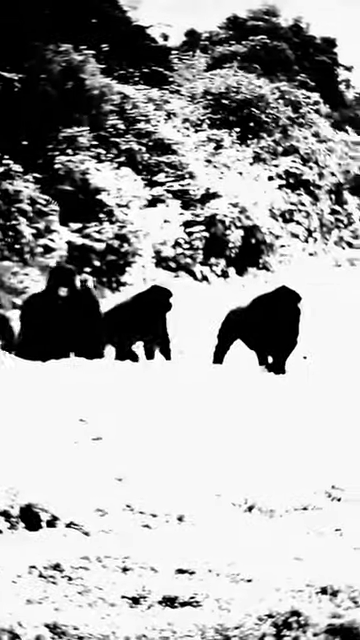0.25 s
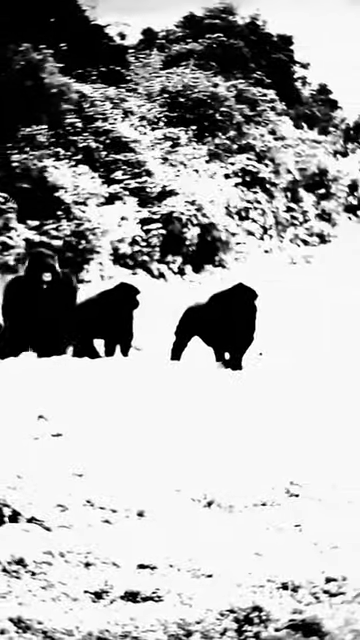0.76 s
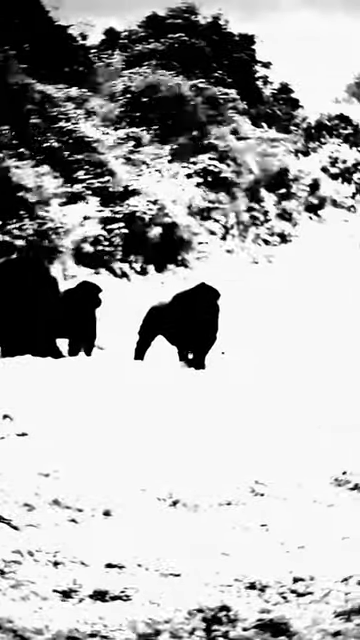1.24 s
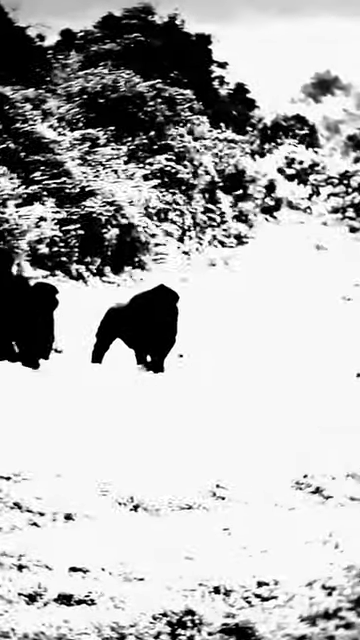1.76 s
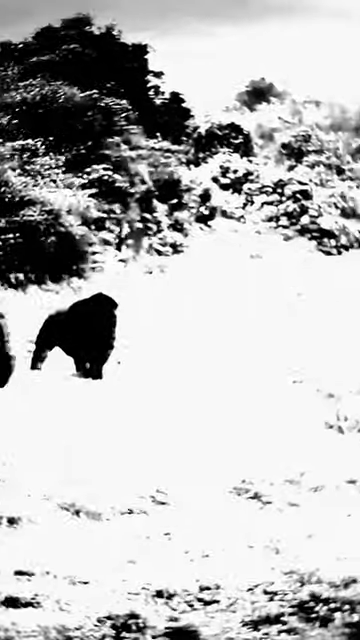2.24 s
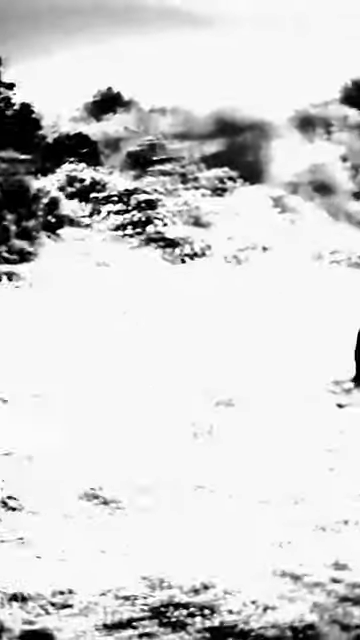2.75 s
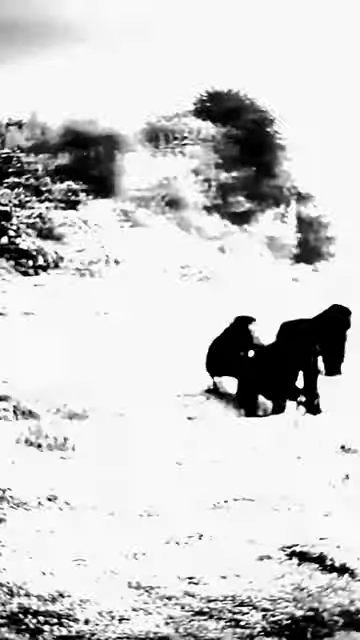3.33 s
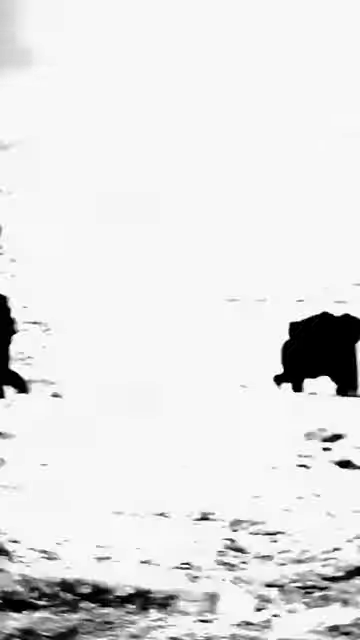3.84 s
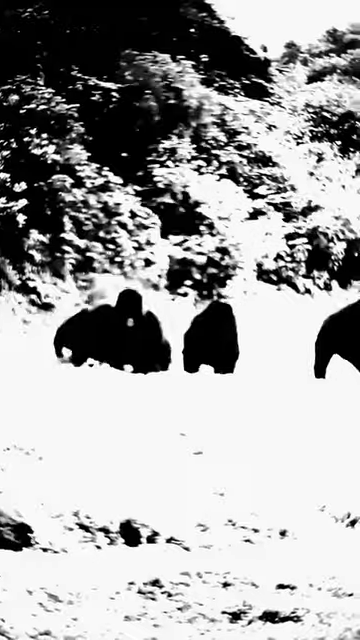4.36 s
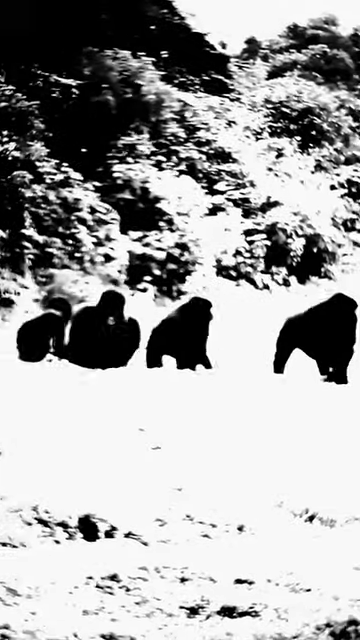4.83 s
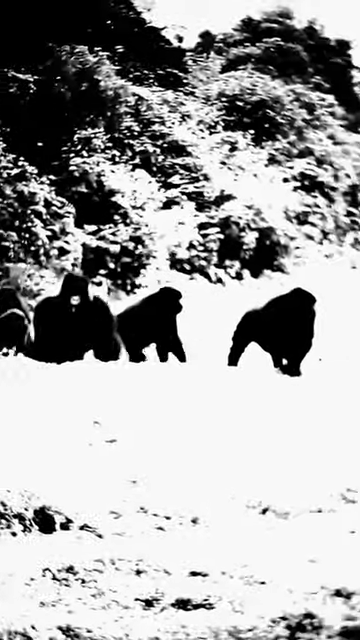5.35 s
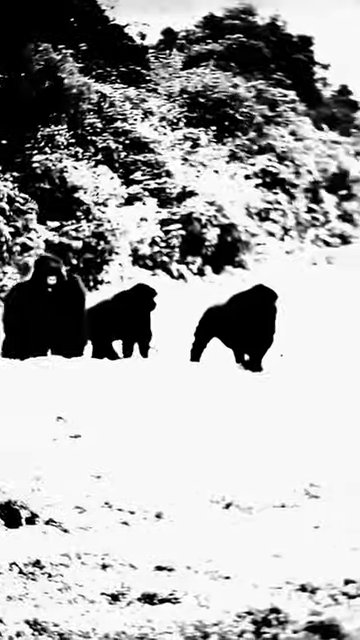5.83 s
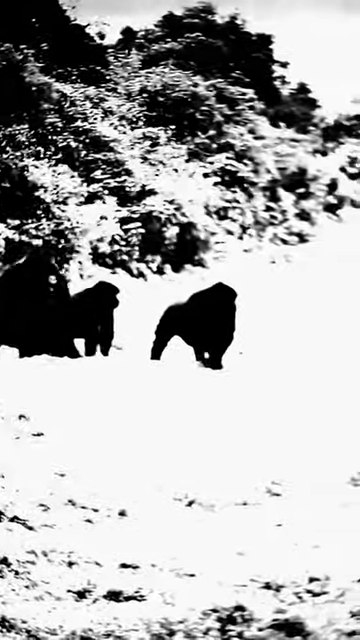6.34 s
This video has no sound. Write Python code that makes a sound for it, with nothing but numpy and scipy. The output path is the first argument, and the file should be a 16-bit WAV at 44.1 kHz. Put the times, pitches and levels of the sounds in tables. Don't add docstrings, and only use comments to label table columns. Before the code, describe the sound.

Close, dry outdoor pickup on a small two-port microphone, with soft low wind rumble, hum and thin air. Apes give breathy throat barks, rattling trills of glottal flaps and loud jaw snaps, then surging, raspy screeches from wide-open mouths. Others stir faintly in the bushes. The calls shrink to a growl, cut out briefly after four seconds, nearly stop, then the opening barks repeat abruptly.

```python
import sys
import numpy as np
from scipy import signal
from scipy.fft import rfft, irfft, next_fast_len
from scipy.io import wavfile
from scipy.ndimage import uniform_filter1d, minimum_filter1d

SR = 44100
rng = np.random.default_rng(int(sys.argv[2]) if len(sys.argv) > 2 else 0)


def magnitude_from_level(level_db):
    exponent = np.asarray(level_db, float) / 20
    return 10 ** exponent


def wrap_up_sound(samples):
    columns = np.atleast_2d(samples).T
    tamed = np.clip(columns, -1, 1)
    steps = np.round(tamed * 32767).astype(np.int16)
    wavfile.write(sys.argv[1], SR, steps)


N = 290619
STEP = 32


def evened(x):
    return x / np.sqrt(np.mean(x ** 2) + 1e-20)


def noise():
    return rng.standard_normal(N)


def read(hz, at_hz, value):
    return np.interp(np.log(hz + 1), np.log(np.asarray(at_hz) + 1), value)


def add(mix, s, sound):
    part = mix[round(s * SR):][:len(sound)]
    part += sound[:len(part)]


def wander(per_s):
    return evened(signal.lfilter(*signal.butter(2, per_s, fs=SR), noise()))


def resonate(x, hz, width, count=2):
    turn = np.exp(2j * np.pi * np.cumsum(hz * np.ones(len(x))) / SR)
    r = np.exp(-np.pi * width / SR)
    z = x / turn + 1e-18
    for _ in range(count):
        z = signal.lfilter([1 - r], [1, -r], z)
    return evened((turn * z).real)


def coloured(x, points):
    at_hz, db = np.transpose(points)
    return evened(irfft(rfft(x) * magnitude_from_level(read(np.fft.rfftfreq(N, 1 / SR), at_hz, db)), N))


# start_s [s], wind_db [dB], hum_db [dB]
RUMBLE = [(0.0, -43, -45), (0.24, -59, -54.5), (0.5, -48, -48.5), (0.68, -51, -55), (2.11, -60.5, -52),
          (2.679, -84, -56.5), (3.1, -67, -56.5), (4.86, -100, -63.5), (5.08, -69, -52.5),
          (6.31, -87, -57.5), (6.59, -57, -54)]
# at_hz [Hz], density_db [dB per Hz]
AIR = [(53, -32.5), (90, 7), (124, 14.5), (156, -9), (410, -3.5), (918, 7.5), (1900, -12.5), (3130, 6),
       (4250, -35.5), (5520, -61.5), (9350, -120)]


def background():
    s, wind_db, hum_db = np.transpose(RUMBLE)
    t = np.arange(N) / SR
    wind = magnitude_from_level(np.interp(t, s, wind_db)) * resonate(noise(), 38, 14, count=4)
    hum = np.sqrt(2) * magnitude_from_level(2.5 * wander(4)) * np.sin(2 * np.pi * 59.8 * t)
    hum = hum + magnitude_from_level(-9) * resonate(noise(), 73, 30)
    hum = hum + magnitude_from_level(-7) * resonate(noise(), 80, 200)
    air = magnitude_from_level(-61.5 + 0.96 * wander(12)) * coloured(noise(), AIR)
    return wind + magnitude_from_level(np.interp(t, s, hum_db)) * evened(hum) + air


def puffs(flaps_per_s, jitter, depth, fade):
    turns = np.cumsum(flaps_per_s * np.exp(jitter * wander(24.745))) / SR
    strengths = magnitude_from_level(2.2 * np.clip(rng.standard_normal(4000), -2, 1.2))
    strength = strengths[turns.astype(int) % 4000]
    gate = uniform_filter1d(strength * np.exp(-(turns % 1) / fade), size=40)
    return (np.clip(1 - depth, 0, 1) + depth * evened(gate)) * noise()


def claps(per_s, jitter):
    turns = np.cumsum(per_s * np.exp(jitter * wander(150) + 0.12 * wander(6))) / SR
    closing = np.diff(np.floor(turns), prepend=0) > 0
    return evened(closing * magnitude_from_level(3 * noise()))


def bursts(s, hold, db, rise_db_s, fall_db_s):
    after = np.arange(0, N, STEP) / SR - s[:, None]
    gone = np.maximum(after - hold[:, None], 0)
    linger = magnitude_from_level(2 * (-44.5 - 64.5 * gone))
    shape = magnitude_from_level(2 * rise_db_s * np.minimum(after, 0)) * (magnitude_from_level(-2 * fall_db_s * gone) + linger)
    return magnitude_from_level(2 * db)[:, None] * shape


def along(curve, silent=-150):
    s, db, *columns = np.transpose(curve)
    t = np.arange(0, N, STEP) / SR
    return [np.interp(t, s, db, silent, silent)] + [np.interp(t, s, c) for c in columns]


def joined(powers, *values):
    total = powers.sum(0) + 1e-30
    weight = powers ** 2
    rows = [10 * np.log10(total)] + [(weight * v).sum(0) / weight.sum(0) for v in values]
    at = np.arange(0, N, STEP)
    return [np.interp(np.arange(N), at, uniform_filter1d(r, size=5)) for r in rows]


# start_s [s], effort_db [dB], throat_db [dB against mouth], throat_hz [Hz], breath_db [dB]
SCREAMS = [
    [(2.18, -52.5, 6.5, 1187, 14), (2.212, -25.5, 3, 1250, 8), (2.24, -19, 1.5, 1280, 0),
     (2.305, -23, -7.5, 1260, -2), (2.432, -18, -10, 1200, -7.5), (2.485, -17, -14.5, 1173, 4),
     (2.515, -21, -11, 1180, 6), (2.55, -15.5, -11.5, 1207, -8), (2.668, -26, -16, 1252, 2.5),
     (2.732, -16.5, -13, 1242, -5.5), (2.83, -18.5, -13.5, 1266, -5), (2.874, -21, -7, 1334, 0),
     (2.924, -42, 1.5, 1424, 12.5), (2.96, -51, -6, 1424, -1)],
    [(3.07, -50, -1.5, 1188, 17), (3.156, -26, 2, 1172, 4), (3.212, -20.5, -9.5, 1134, -2.5),
     (3.25, -20.5, -4, 1130, -5.5), (3.364, -23.5, -5, 1288, 0.5), (3.478, -20.5, -4, 1300, -1),
     (3.498, -21, -5, 1260, 3.5), (3.592, -25, -6.5, 1330, 1.5), (3.63, -38.5, 4.5, 1490, 17)],
    [(3.63, -42, 9, 1530, 15), (3.658, -24.5, 1, 1412, 4.5), (3.716, -22.5, -6, 1404, 4.5),
     (3.758, -27, -8, 1330, 5), (3.776, -38, 0, 1260, 16), (3.87, -49, -5, 1344, 18)],
]
# start_s [s], level_db [dB]
STIR = [(0.0, -69), (0.17, -56), (0.46, -55.5), (0.78, -60.5), (1.0, -54.5), (1.37, -59.5), (1.66, -50.5),
        (1.84, -59), (2.15, -51.5), (3.05, -50.5), (3.86, -50.5), (4.15, -50.5), (4.45, -69.5), (4.67, -71),
        (4.89, -81.5), (5.05, -63), (5.11, -54)]


def long_calls():
    return *np.transpose([along(c) for c in SCREAMS], (1, 0, 2)), along(STIR)[0][None]


# at_hz [Hz], density_db [dB per Hz]
RASP = [(3300, -30), (3700, 0), (4400, -3), (4950, -22), (5400, -14), (6200, -18), (6900, -12), (8650, -15),
        (8900, -25), (9700, -28), (10600, -32), (12000, -43), (15500, -51)]
# start_s [s], peak_db [dB], ring_hz [Hz]
SNAPS = [(0.0136, -23, 3350), (0.0376, -17, 3210), (0.0616, -10, 3060), (0.182, -34, 2590),
         (0.2208, -21, 2570), (.028, -26, 2820), (0.4808, -19, 3030), (0.4815, -29, 4260),
         (0.4912, -24.5, 2000), (0.492, -28, 4060), (0.501, -3.5, 2990), (0.518, -10.5, 3114),
         (0.5336, -7.5, 2940), (0.9553, -26, 3300), (1.1159, -21, 2540), (1.17, -12, 2580),
         (1.242, -12, 2900), (1.3973, -25.5, 2970), (1.9319, -23, 2380), (1.951, -19, 2280),
         (1.9783, 8, 2867), (1.992, -4, 2746), (2.204, -22, 2430), (3.651, -24, 2830), (3.7501, -5, 3110),
         (4.2374, -16.5, 3200), (4.25, -19, 3020), (4.269, -5.5, 3110), (4.281, -13, 3020)]
# start_s [s], peak_db [dB], throat_hz [Hz]
FLAPS = [(0.183, -36.5, 728), (0.183, -26, 1140), (0.195, -29.5, 1082), (0.218, -17, 1108),
         (0.241, -18.5, 993), (0.339, -26.5, 1366), (0.379, -23, 1284), (0.387, -26, 1380),
         (0.439, -30.5, 1330), (0.5, -23, 1536), (0.523, -32.5, 940), (0.544, -14, 1094),
         (0.753, -39, 1400), (0.786, -44, 1470), (0.809, -33, 1525), (0.829, -25.5, 967),
         (0.829, -30.5, 984), (0.871, -22.5, 957), (0.992, -31, 1400), (1.025, -34, 1250),
         (1.069, -46, 1240), (1.098, -30, 1374), (1.12, -21, 1260), (1.127, -22.5, 1004),
         (1.171, -10.5, 1208), (1.284, -25, 966), (1.347, -38, 1048), (1.397, -35, 925),
         (1.418, -23.5, 1070), (1.446, -17.5, 1280), (1.526, -13, 1126)]
# start_s [s], peak_db [dB], throat_hz [Hz]
MORE_FLAPS = [(0.202, -22, 1084), (0.228, -21.5, 998), (0.257, -21.5, 952), (0.269, -24.5, 1036),
              (0.296, -32.5, 1344), (0.306, -28, 1410), (0.315, -28.5, 1410), (0.35, -24.5, 1326),
              (0.363, -27.5, 1360), (0.395, -29.5, 1366), (0.407, -28.5, 1270), (0.419, -32, 1293),
              (0.455, -28, 1296), (0.467, -33, 1320), (0.554, -21, 923), (0.571, -12, 982),
              (0.583, -22, 1000), (0.595, -18, 954)]
# start_s [s], peak_db [dB], throat_hz [Hz]
GROWL_FLAPS = [(3.864, -40.5, 1530), (3.901, -35, 1165), (3.915, -29, 1480), (3.928, -20, 1520),
               (3.948, -23, 768), (3.968, -30.5, 1440), (3.992, -19, 1540), (4.091, -33, 1265),
               (4.141, -40.5, 1250), (4.189, -29, 1047)]
# start_s [s], peak_db [dB], pitch_hz [Hz, at the start], t60_s [s]
KNOCKS = [(1.734, -53, 414, 0.056), (2.108, -26.5, 722, .03), (2.122, -17.5, 520, 0.028),
          (2.131, -20, 652, 0.03), (2.145, -27, 568, 0.024), (2.172, -36, 596, 0.074),
          (4.692, -45, 1020, 0.023), (4.97, -33.5, 1060, 0.065), (4.981, -39, 1190, .025),
          (4.998, -29, 520, 0.069), (5.0535, -21.5, 793, 0.061), (5.064, -26.5, 480, .05),
          (5.075, -35, 700, 0.02), (5.084, -37, 430, .04), (4.934, -43, 400, .04)]
# start_s [s], peak_db [dB], ring_hz [Hz]
FAR_SNAPS = [
    (4.941, -33, 2440),
    (4.951, -34, 2530),
    (4.962, -37, 2960),
    (4.969, -25, 2650),
    (4.99, -18, 2650),
    (4.998, -25, 2457),
    (5.008, -27, 2800),
]


def snaps():
    out, t = np.zeros(N), np.arange(6000) / SR
    spit = coloured(noise(), RASP)
    onset = np.sin(np.pi / 2 * np.minimum(t / 0.0028, 1)) ** 2
    flaps = FLAPS + GROWL_FLAPS + MORE_FLAPS
    for rows, spit_db, t60 in [(SNAPS, -17.5, 0.024), (FAR_SNAPS, -40, 0.024), (flaps, -45, 0.039)]:
        for s, db, hz in rows:
            ring = np.sin(2 * np.pi * hz * t) + magnitude_from_level(spit_db) * spit[round(s * SR):][:len(t)]
            add(out, s, magnitude_from_level(db - 60 * t / t60) * onset * ring)
    for s, db, hz, t60 in KNOCKS:
        turns = np.cumsum(hz * (0.61 + 0.5 * np.exp(-t / 0.0098))) / SR
        decay = magnitude_from_level(db + 3 - 60 * t / t60)
        add(out, s, decay * np.minimum(t / 0.0018, 1) * np.sin(2 * np.pi * turns))
    return out


# start_s [s, at full strength], hold_s [s], front_db [dB, front cavity],
# back_db [dB, back cavity against front], rasp_db [dB against front]
YELPS = [(0.03, 0.0057, -48, 5, 13.5), (0.044, 0.019, -33.5, -5.5, -5.5), (0.209, 0.052, -46.5, 9, -8.5),
         (0.365, 0.0077, -49.5, 1, -4.5), (0.496, 0.0084, -48, 18, -9), (0.502, 0.012, -37.5, -3, 10.5),
         (0.525, 0.026, -28.5, 1, -14), (0.837, 0.0073, -41, 11, -12), (0.858, 0.021, -35.5, 7, -13),
         (0.92, 0.0029, -48, 6, 1), (1.138, 0.034, -25.5, 0, -16.5), (1.205, 0.072, -25, -10, -12.5),
         (1.422, 0.029, -26, 0, -25), (1.447, 0.037, -27.5, 6, -16.5), (1.51, 0.022, -40, -15, -8.5),
         (1.871, 0.05, -46.5, 4, -22.5), (1.96, 0.014, -26.5, -5, -5), (2.002, 0.033, -27, -5.5, -7),
         (3.913, 0.057, -39, -4.5, -7.5), (4.006, 0.044, -45.5, 2, -12), (4.101, 0.099, -37, -11.5, -21),
         (4.251, 0.028, -23.5, -11.5, -9), (4.7, 0.0042, -59.5, -4, -16.5), (4.93, 0.014, -53, -9, -24),
         (4.965, 0.04, -41, -8, -25.5)]


def high_controls():
    effort_db, _, _, breath_db, stir_db = long_calls()
    s, hold, db, back_db, rasp_db = np.transpose(YELPS)
    rise_db_s, fall_db_s = 704.5, 245
    back = [bursts(s, hold, db + back_db, rise_db_s, fall_db_s),
            magnitude_from_level(2 * (effort_db + 1.5)), magnitude_from_level(2 * (stir_db + 1.5))]
    front = [bursts(s, hold, db, rise_db_s, fall_db_s), magnitude_from_level(2 * effort_db), magnitude_from_level(2 * stir_db)]
    rasp = bursts(s, hold, db + rasp_db, rise_db_s=1399.5, fall_db_s=297.5)
    hiss_db = np.vstack([1.646 * effort_db - 2.5 + breath_db, stir_db - 10])
    shut = np.r_[np.clip((-22 - rasp_db) / 4, 0, 1), np.zeros(len(SCREAMS) + 1)][:, None]
    return (*joined(np.vstack(back)), *joined(np.vstack(front), shut), *joined(rasp),
            *joined(magnitude_from_level(2 * hiss_db)))


# at_hz [Hz], density_db [dB per Hz]
BACK = [(900, -68.5), (1450, -13.5), (1800, -5.5), (2250, -1), (2600, -3), (3000, -23.5), (4000, -88)]
# at_hz [Hz], density_db [dB per Hz]
FRONT = [(1700, -70.5), (2500, -9.5), (2800, 0), (3250, 1.5), (3550, -6.5), (4000, -58.5), (5000, -87.5)]
# at_hz [Hz], tilt_db [dB]
SCREAM_RASP_TILT = [(4300, -1), (5000, 6.5), (5500, 2.5), (6000, -1.5), (6900, -0.5), (7700, -6),
                    (8400, -5), (10000, -2.5), (14000, 3)]


def screech():
    back_db, front_db, shut, rasp_db, hiss_db = high_controls()
    breath = puffs(flaps_per_s=190, jitter=0.3, depth=0.2, fade=0.7)
    rasp = coloured(breath, RASP)
    scream = breath + 0.7 * claps(per_s=420, jitter=0.25)
    back_whistle = resonate(scream, 2250 * (1 + 0.06 * wander(9)), 170)
    back = coloured(scream, BACK) + magnitude_from_level(-4) * back_whistle
    mouth_hz = 3226 + shut * (2750 - 3226)
    front_whistle = resonate(scream, mouth_hz * (1 + 0.04 * wander(12)), 220)
    front = magnitude_from_level(-14 * shut) * coloured(scream, FRONT) + magnitude_from_level(-8 + 9.9 * shut) * front_whistle
    rasp = magnitude_from_level(rasp_db) * rasp + magnitude_from_level(hiss_db) * coloured(rasp, SCREAM_RASP_TILT)
    return magnitude_from_level(back_db) * evened(back) + magnitude_from_level(front_db) * evened(front) + rasp


# start_s [s, at full strength], hold_s [s], level_db [dB], chest_hz [Hz]
HEAVES = [(0.056, 0.013, -40, 657), (0.271, 0.0038, -46.5, 441), (0.519, 0.0086, -35.5, 263.3),
          (0.749, 0.035, -58, 620), (0.831, 0.12, -56.5, 600), (1.114, 0.061, -49, 459),
          (1.231, 0.048, -28, 579), (1.393, 0.021, -48.5, 491), (1.735, 0.0095, -50, 341),
          (1.901, 0.022, -52.5, 439), (1.979, 0.028, -31, 251), (2.12, 0.03, -31.5, 336),
          (2.16, 0.0069, -35.5, 400), (2.392, 0.0063, -37, 312), (2.478, 0.02, -39.5, 304),
          (2.584, 0.026, -35, 418), (2.7, 0.047, -34.5, 355), (2.799, 0.1, -42.5, 354),
          (3.016, 0.1, -48.5, 330), (3.142, .15, -32.5, 776), (3.329, 0.022, -42, 537),
          (3.492, 0.098, -48, 360), (3.695, 0.0091, -41, 320), (3.762, 0.02, -37, 437),
          (3.936, 0.053, -42, 383), (4.02, 0.055, -44.5, 517), (4.268, 0.019, -43.5, 543),
          (4.695, 0.0014, -68.5, 602), (4.966, 0.058, -40, 330), (5.061, 0.015, -37.5, 376)]
# [dB, voiced line against breath]
BARKS = [(0.065, 0.004, -35, 1370, -11), (0.215, 0.055, -32.5, 1032, -10.5), (0.297, 0.19, -40.5, 1360, 14),
         (0.524, 0.04, -23.5, 990, -13), (0.829, 0.077, -29, 939, -3.5), (0.884, 0.038, -28.5, 1274, -6),
         (1.131, 0.066, -24, 1140, -1), (1.436, 0.085, -23, 1210, -5), (1.217, 0.023, -31.5, 960, -4.5),
         (1.88, .18, -37, 1208, -17), (3.943, .02, -38, 868, 3), (3.942, 0.12, -34, 1260, -30),
         (4.043, 0.047, -38.5, 1150, -13), (4.243, 0.049, -37.5, 935, 0.5), (4.248, 0.068, -44.5, 1447, 4),
         (4.322, 0.093, -47.5, 1403, 5), (4.69, 0.0026, -64.5, 1070, -6.5), (4.971, 0.011, -42, 1054, 4),
         (5.007, .02, -47, 1015, 0)]


def low_controls():
    effort_db, share_db, scream_hz, _, stir_db = long_calls()
    s, hold, db, hz = np.transpose(HEAVES)
    steady = magnitude_from_level(2 * np.vstack([effort_db - 33, stir_db - 7.5]))
    heaves = bursts(s, hold, db, rise_db_s=454, fall_db_s=301.5)
    chest_hz = np.r_[hz, np.full(len(SCREAMS), 330), 520][:, None]
    chest = joined(np.vstack([heaves, steady]), chest_hz)
    s, hold, db, hz, voiced_db = np.transpose(BARKS)
    into = np.clip(np.arange(0, N, STEP) / SR - s[:, None], 0, hold[:, None])
    climb_per_s = 0.37 * np.clip((db + 34.5) / 6, 0, 1)[:, None]
    steady = magnitude_from_level(2 * np.vstack([effort_db + share_db, stir_db + 3.5]))
    pitch = np.vstack([hz[:, None] * (1 + climb_per_s * into), scream_hz, 1260 + 0 * stir_db])
    voicing = np.r_[voiced_db, np.full(len(steady), -3.5)][:, None]
    barks = bursts(s, hold, db, rise_db_s=603, fall_db_s=277)
    return *chest, *joined(np.vstack([barks, steady]), pitch, voicing)


# at_hz [Hz], density_db [dB per Hz]
CHEST = [(100, -43.5), (230, -8), (300, -7.5), (350, -6.5), (480, -3.5), (600, -3.5), (800, -5.5),
         (1100, -33), (2000, -98)]


def grunt():
    chest_db, chest_hz, throat_db, throat_hz, voiced_db = low_controls()
    growl = puffs(flaps_per_s=50, jitter=0.27, depth=0.24, fade=0.9)
    body = coloured(growl, CHEST)
    chest_ring = resonate(body, chest_hz * (1 + 0.041 * wander(35)), 460, count=3)
    chest = evened(magnitude_from_level(1.5 - 1.5 * (chest_hz - 400) / 100) * body + chest_ring)
    beats = puffs(flaps_per_s=88, jitter=0.12, depth=0.75, fade=0.3)
    line = resonate(beats, throat_hz * (1 + 0.012 * wander(20)), 125)
    breath = resonate(growl + 0.25 * beats, throat_hz * 1.086, 1646, count=10)
    throat = (breath + magnitude_from_level(voiced_db) * line) / np.sqrt(1 + magnitude_from_level(2 * voiced_db))
    return magnitude_from_level(chest_db) * chest + magnitude_from_level(throat_db) * throat


def streaked(x, patchy_db):
    z = signal.stft(x, nperseg=1024)[2]
    field = uniform_filter1d(rng.standard_normal(z.shape), size=5, axis=0)
    field = uniform_filter1d(field, size=5, axis=1)
    gain = magnitude_from_level(patchy_db * np.clip(evened(field), -2.5, 1.6))
    return signal.istft(z * evened(gain), nperseg=1024)[1][:N]


def gated(x):
    hz, _, z = signal.stft(x, SR, nperseg=1024)
    blocks = rng.random((len(hz) // 8 + 1, z.shape[1] // 4 + 1)) < 0.27
    shown = np.kron(blocks, np.ones((8, 4)))[:len(hz), :z.shape[1]]
    gain = np.where((hz[:, None] < 8850) | (shown > 0), 1, magnitude_from_level(-25))
    return signal.istft(z * gain, nperseg=1024)[1][:N]


# start_s [s], length_s [s], level_db [dB], pitch_hz [Hz]
NOTES = [(0.5, 0.0064, -37.5, 3020), (0.54, 0.061, -26.5, 1040), (1.23, 0.013, -31, 468.6),
         (1.25, 0.044, -29.5, 569), (1.283, 0.051, -27, 2840), (1.47, 0.097, -32, 1120),
         (0.574, 0.02, -37, 3130), (.592, .016, -32.5, 3140), (3.973, 0.054, -30.5, 1520),
         (2.064, 0.011, -33, 2000), (2.45, 0.063, -18.5, 2135)]


def notes():
    out = np.zeros(N)
    for s, length, db, hz in NOTES:
        t = np.arange(0, length, 1 / SR)
        swell = np.sin(np.pi * t / length) ** 0.5
        add(out, s, magnitude_from_level(db + 5) * swell * np.sin(2 * np.pi * hz * t))
    return out


# start_s [s], level_db [dB], pitch_hz [Hz]
SQUEAL = [
    (3.58, -42, 1635),
    (3.615, -28.5, 1616),
    (3.635, -27, 1540),
    (3.643, -28, 1883),
    (3.65, -28.5, 1840),
    (3.655, -75, 1760),
]


def squeal():
    db, hz = (np.repeat(c, STEP)[:N] for c in along(SQUEAL))
    turns = 2 * np.pi * np.cumsum(hz) / SR
    tone = np.sin(turns) + magnitude_from_level(-6.5) * np.sin(2 * turns)
    return np.sqrt(2) * magnitude_from_level(uniform_filter1d(db, size=64)) * tone


def ground(x):
    t = np.arange(8000) / SR
    taps = rng.choice([-1., 1.], len(t)) * (rng.random(len(t)) < 0.05)
    taps = taps * magnitude_from_level(-60 * t / 0.17) * (t > 0.003)
    return x + magnitude_from_level(-11.5) * signal.oaconvolve(x, taps / np.linalg.norm(taps))[:N]


def spliced(x):
    mute_s, back_s, replay_samples = 4.192, 4.226, 225270
    t = np.arange(N) / SR
    back_in = np.clip((t - back_s) / 0.0062, 0, 1)
    x = x * np.where(t > mute_s, magnitude_from_level(-22 * (1 - back_in)), 1)
    x = x + magnitude_from_level(-49.5) * (abs(t - mute_s) < 0.0001) * noise()
    return x[np.arange(N) % replay_samples]


# at_hz [Hz], level_db [dB], phase_rad [rad], likeness [0-1]
PORTS = [(40, .7, 0, .985), (120, .5, 0, .97), (430, -2, -.4, .98), (600, 1, -.3, .93), (730, 0, -1.4, .8),
         (860, -8, -1.6, .97), (1030, -7, -.7, .97), (1400, -5, -1.1, .9), (1520, -12, .2, .6),
         (1640, -9, -.7, .88), (1760, -14, -3, .8), (1900, -9, -5.1, .96), (2150, -10, -5.8, .98),
         (2550, -7, -5.5, .97), (2720, -14, -6.2, .85), (2930, -18, -5, .9), (3230, -13, -4.9, .97),
         (3500, -11, -4.6, .93), (3900, -12, -5, .86), (4150, -17, -5.3, .75), (4450, -15, -7.6, .8),
         (4750, -4, -8.3, .8), (5170, -5, -9.2, .88), (6200, -4, -9.4, .88), (6450, 1, -10.5, .4),
         (6800, -13, -13.8, .6), (7350, -2, -13.6, .8), (7750, 1, -12.4, .88), (8200, 6, -13.8, .78),
         (8650, -5, -12.5, .8), (10000, -1, -12.5, .5)]
# at_hz [Hz], level_db [dB]
CASE = [(600, -2), (740, -1), (870, 3), (1330, -2.5), (1450, -4), (1560, -0.5)]


def ports(x):
    size = next_fast_len(N + 8192)
    hz = np.fft.rfftfreq(size, 1 / SR)
    at_hz, *columns = np.transpose(PORTS)
    db, phase, same = (read(hz, at_hz, c) for c in columns)
    same = np.clip(same, 0, 1)
    smear = rng.standard_normal(4000) * magnitude_from_level(-30 * np.arange(4000) / 4000)
    other = rfft(smear / np.linalg.norm(smear), size)
    left = magnitude_from_level(db) * (same * np.exp(1j * phase) + np.sqrt(1 - same ** 2) * other)
    centre = np.sqrt(1 + magnitude_from_level(2 * db) + 2 * magnitude_from_level(db) * same * np.cos(phase)) / 2
    case = magnitude_from_level(read(hz, *np.transpose(CASE)))
    return irfft(rfft(x, size) * case / centre * np.array([left, np.ones(len(hz))]), size)[:, :N]


def scene():
    voices = gated(streaked(grunt() + screech(), patchy_db=2.5) + snaps())
    calls = spliced(ground(voices + squeal() + notes()))
    return ports(calls + background())


def roll_off(x):
    return signal.sosfilt(signal.butter(12, 15720, fs=SR, output="sos"), x)


def record(dry):
    room = minimum_filter1d(np.minimum(0.93 / (abs(dry).max(0) + 1e-9), 1), size=301)
    hiss = magnitude_from_level(-77.5) * rng.standard_normal(dry.shape)
    return roll_off(dry * uniform_filter1d(room, size=301) + hiss)


dry = scene()
out = record(dry)
wrap_up_sound(out)
```